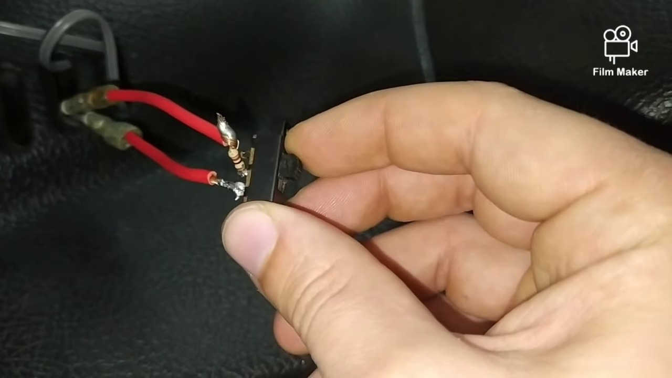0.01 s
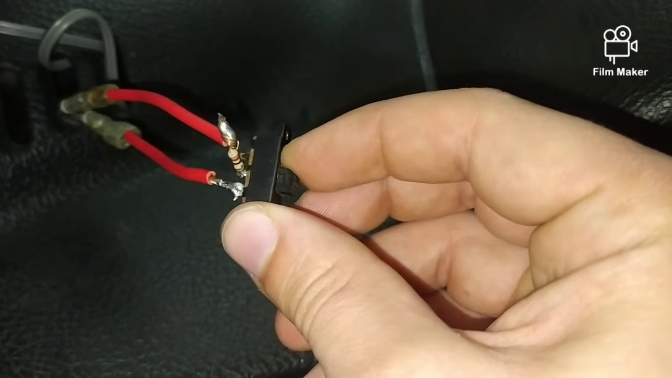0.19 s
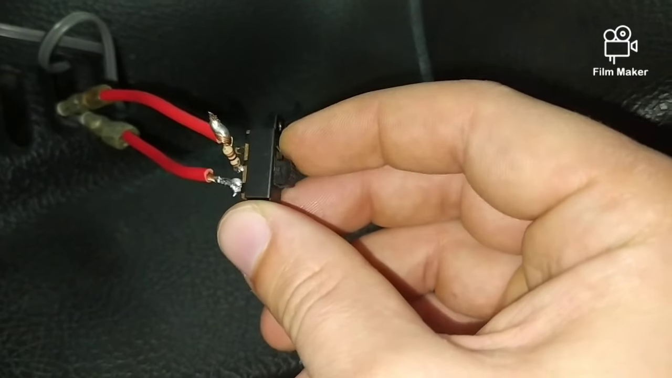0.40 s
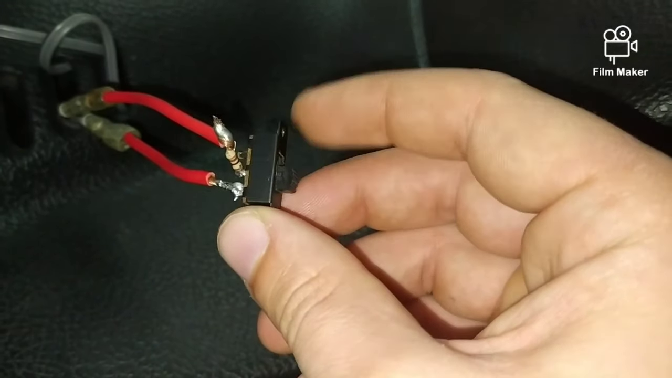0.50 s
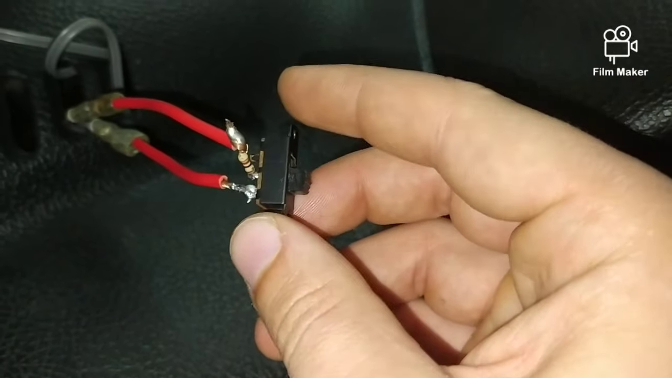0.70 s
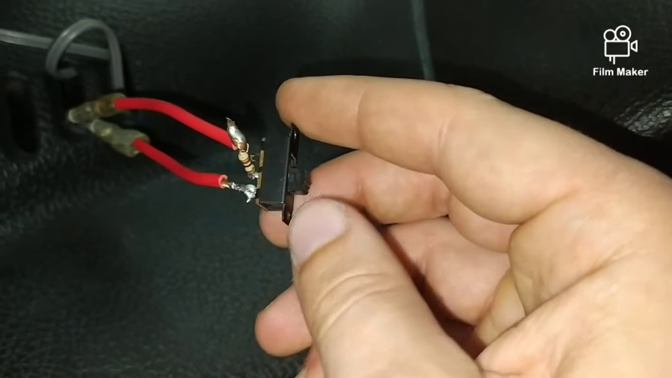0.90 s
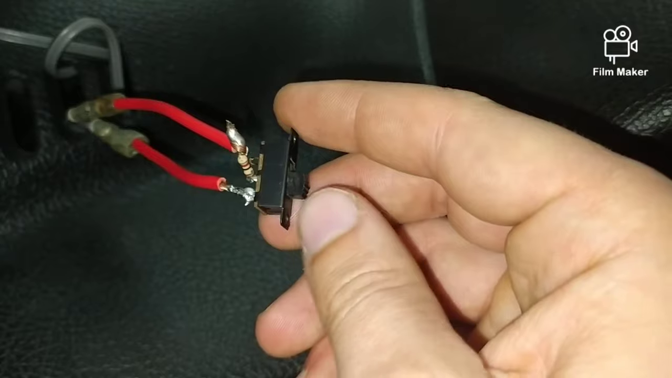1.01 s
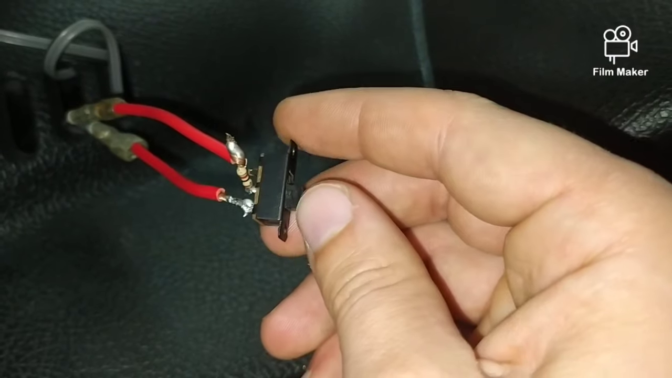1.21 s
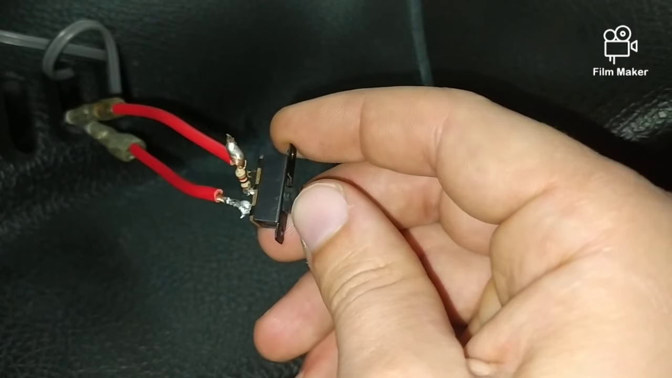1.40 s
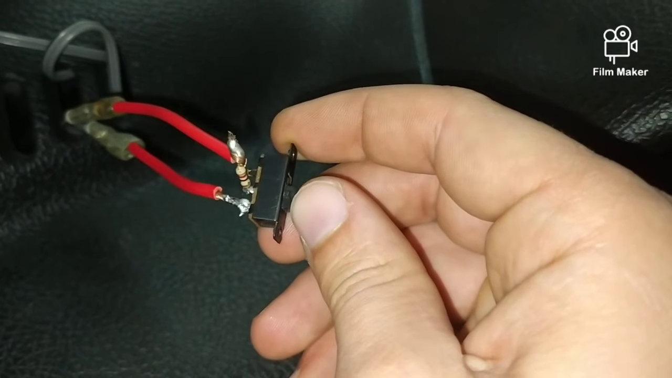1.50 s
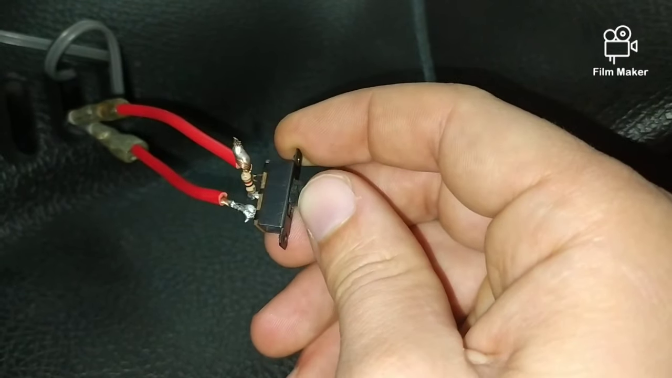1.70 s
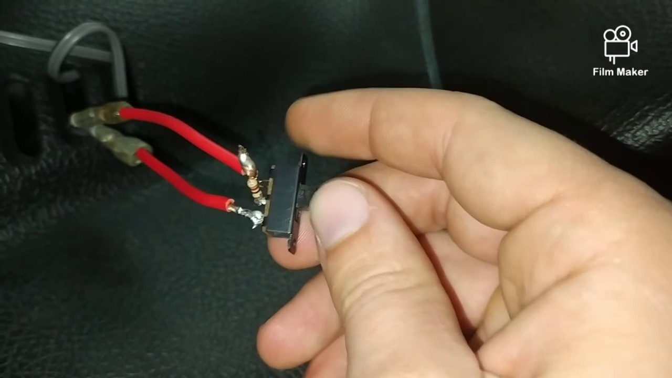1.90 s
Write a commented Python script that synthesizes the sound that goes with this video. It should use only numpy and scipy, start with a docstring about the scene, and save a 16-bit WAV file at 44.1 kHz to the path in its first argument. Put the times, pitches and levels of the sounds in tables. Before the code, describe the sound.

A small hand-held slide switch clicks sharply at 0.2 s: a tiny tick, a bright metallic snap with brief springy ring, then a soft low knock. Faint finger rubs and taps follow over quiet car-cabin rumble, drone and thin hiss, with a barely audible high trill pulsing twice a second. From 1.5 s a thumb drags with a low groan; at 1.7 s the slider snaps back, crisp and short, and the grip shifts. Close microphone, short cabin reflections.

```python
"""Inside a quiet car, a microphone close to a small slide switch hears low rumble, drone and thin hiss throughout.
A fingertip touches the housing; the slider ticks off its detent and snaps home at 0.2 s, then a soft low knock.
Its metal frame and spring ring, its plastic knocks and the cabin reflects it, as echoes of shaped noise.
Fingers rub and tap (noise bursts) while a faint high trill (narrow-band noise) swells about twice a second.
From 1.5 s the thumb drags in random slips with a low groan; at 1.7 s the slider snaps back, and the grip shifts."""
import sys
import numpy as np
from scipy import signal
from scipy.fft import rfft, irfft
from scipy.io import wavfile
from scipy.ndimage import uniform_filter1d

SR = 44100
rng = np.random.default_rng(int(sys.argv[2]) if len(sys.argv) > 2 else 0)


def inscribe(sig):
    """Save sig as 16-bit PCM at rate SR to the path in sys.argv[1].

    A 1-D sig is mono; a 2-D sig holds one channel per row.
    Samples are clipped to [-1, 1] before scaling.
    """
    pcm = np.round(np.clip(np.atleast_2d(sig).T, -1, 1) * 32767)
    wavfile.write(sys.argv[1], SR, pcm.astype(np.int16))


N = 88200  # two seconds

# Rub, touch and trill levels set loudness directly; mode, colour, knock and clack levels are relative.
# Blows of the slider: [t/s, level/dB, end stop 0 or 1, contact time constant/ms,
# left minus right/dB, right later by/ms, knock level/dB, clack level/dB]
BLOWS = [(0.2052, -27.5, 0, 1.8, -2.5, 0.1, -15.5, -15), (0.208, -2.5, 0, 1.4, -1.5, 0.3, -5.5, 1.5),
         (0.2175, -17.5, 0, 2.6, -4.5, 0.059, 11.5, 8), (1.6935, -33.5, 1, 0.8, 18, 0.0, -10, -12.5),
         (1.6958, -6.5, 1, 0.36, -6.5, -0.25, -11, 1.5)]
# Resonances of the metal frame and slider: [f/Hz, nominal width/Hz, level at stop 0/dB, level at stop 1/dB]
FRAME_MODES = [(4585, 400, -19, -31), (5950, 520, -11.5, -14.5), (7000, 700, -25.5, -12),
               (7530, 400, -5.5, -7.5), (8560, 150, -1, -10.5), (8900, 400, -1, 2), (9150, 400, -12, -15),
               (9560, 1200, -9.5, 1), (9800, 400, -4, -5), (10900, 600, -16, -12.5),
               (12270, 1100, -12.5, -41), (14040, 800, -12, -15), (15124, 650, -20, -30.5)]
# Close modes of the contact spring, which ring on: [f/Hz, t60/s, level at stop 0/dB, level at stop 1/dB]
SPRING_MODES = [(8360, .05, -9.5, -6.5), (8300, 0.03, -10.5, -16.5), (8453, .055, 0.5, -19.5),
                (8880, .05, -2.5, -16), (9120, .05, -0.5, -7), (9020, 0.069, -1.5, -8),
                (8400, 0.066, -12.5, 5.5), (9360, 0.038, -8.5, -13), (8900, 0.063, -12, -5),
                (10560, .045, -4, -16)]
# Low modes of the hand-held housing, the knock: [f/Hz, t60/s, level/dB]
HOUSING_MODES = [(315, 0.029, -4.5), (375, 0.037, 10), (588.6, .045, -15.5), (780, .04, -11)]
# Modes of the plastic slider, the clack: [f/Hz, t60/s, level/dB]
SLIDER_MODES = [(1070, .015, -5.5), (1280, 0.0053, -1.5), (2023, .02, -1.5), (2350, .02, -4.5),
                (2650, 0.0052, -4.5), (3010, .015, -10.5)]
# Resonances of the thumb's rub before the return stroke: [f/Hz, t60/s, level/dB]
DRAG_MODES = [(208, 0.039, -1.5), (226, 0.051, -3.5), (294, 0.037, -5), (347, 0.0445, -10.5),
              (465, 0.094, -2.5), (519, 0.099, -12), (712.5, 0.11, -4)]
# Fingers sliding on the housing: [t/s, attack/s, hold/s, release time constant/s, level/dB]
RUBS = [(0.336, 0.028, 0.045, 0.13, -63), (1.301, 0.039, .04, 0.11, -73),
        (1.664, 0.023, 0.032, 0.025, -65.5), (1.742, 0.052, 0.03, 0.11, -65.5),
        (1.964, 0.012, 0.011, 0.034, -71)]
# Spectrum of the sliding skin: [f/Hz, level/dB]
RUB_COLOUR = [(150, 3.5), (400, 5), (900, 1.5), (1400, 3), (2200, 7), (3100, -12.5), (5000, -9.5),
              (9000, -6.5), (12000, -27), (16000, -27)]
# Soft fingertip touches: [t/s, level/dB]
TOUCHES = [(0.078, -71.5), (0.97, -70), (1.231, -75.5), (1.394, -69), (1.477, -76.5), (1.938, -69)]
# Spectrum of a touch: [f/Hz, level/dB]
TOUCH_COLOUR = [(100, -12), (350, 2.5), (850, 9.5), (1500, -5.5), (2500, 1.5), (5000, -40), (16000, -20)]
# Swells of the faint high trill: [t/s, length/s, level/dB]
TRILLS = [(0.193, 0.33, -76.5), (0.695, 0.32, -82.5), (1.2, 0.3, -79), (1.689, 0.222, -77.5)]
# Spectrum of the cabin background: [f/Hz, level per Hz/dB]
AIR_COLOUR = [(20, 0.5), (33, -9.5), (60, -12), (113, -20), (160, -19.5), (204, -14.5), (262, -20.5),
              (460, -23), (600, -28), (1060, -32), (2200, -32.5), (3700, -38), (7000, -39.5),
              (10200, -33.5), (11500, -43.5), (16000, -52)]

CLICK_DB, SPRING_DB, KNOCK_DB, CLACK_DB = 4.5, -6.5, -21.5, -23.5
FRAME_LOW_HZ = 4400  # the small frame radiates little below this
PANEL_DAMP_HZ = 12000  # upholstery dulls the near reflections
TAIL_HZ, TAIL_WIDTH_HZ = 8740, 2800  # the band that lingers longest
DRAG_S, DRAG_LENGTH_S, DRAG_DB = 1.545, 0.11, -60  # length is attack and hold together
DRAG_ATTACK_S, DRAG_RELEASE_S = 0.0095, 0.14
SLIPS_PER_S, SLIP_SOFT_HZ = 900, 750  # skin softens each slip
GROAN_HZ, GROAN_DB, GROAN_WAVER = 318, -61.5, 0.012  # waver is a fraction of the pitch
RUB_PAN_DB, RUB_ROUGH_DB = -8, -0.5  # left minus right; spread of the random roughness
TRILL_HZ, TRILL_WIDTH_HZ, TRILL_FADE_S = 4513, 90, 0.079
TRILL_REST_DB = -87.5  # it never quite stops
AIR_DB, AIR_PAN_DB, AIR_SIDE, AIR_WAVER_DB = -65, -1, 0.9, 0.1
DRONE_HZ, DRONE_WIDTH_HZ, DRONE_DB = 197.6, 14, -83.5
TOP_HZ = 15800  # upper limit of the sound


def switch():
    """Each brief, rough contact snaps the frame, rings the spring and knocks the plastic; the cabin reflects them."""
    t = clock()
    hz, width, *stop_levels = np.array(FRAME_MODES, float).T
    frames = [resonator(hz, width, db) for db in stop_levels]
    springs = [ring([(f, t60, dbs[stop]) for f, t60, *dbs in SPRING_MODES], np.sin) for stop in range(2)]
    housing = ring(HOUSING_MODES, np.cos)
    slider = ring(SLIDER_MODES, np.cos)
    high_pass = signal.butter(4, FRAME_LOW_HZ, "high", fs=SR, output="sos")
    bright, dull = np.zeros((2, N)), np.zeros((2, N))
    for start, db, stop, contact_ms, pan_db, lag_ms, knock_db, clack_db in BLOWS:
        contact = even(np.exp(-(t * 1000 / contact_ms) ** 2))

        def struck(body):
            """The body's ring, set off by this contact."""
            return energy(convolve(contact, body))

        stop = int(stop > 0.5)
        metal = undb(CLICK_DB) * struck(frames[stop])
        metal += undb(SPRING_DB) * signal.sosfilt(high_pass, struck(springs[stop]))
        clack = undb(CLACK_DB + clack_db) * struck(slider)
        left, right = undb(db) * pan(pan_db) * (metal + clack)
        bright += np.array([delay(left, start), delay(right, start + lag_ms / 1000)])
        # the low knock reaches both channels alike
        dull += undb(db + KNOCK_DB + knock_db) * delay(struck(housing)[0], start)
    return bright + dull + cabin(bright, dull)


def cabin(bright, dull):
    """Near panels and a long coloured tail answer the click; a short, narrower boom answers the knock."""
    panels = reflections(db=-6, rise_s=0.0016, t60=0.041)
    panels = signal.lfilter(*signal.butter(1, PANEL_DAMP_HZ, fs=SR), panels)
    lingering = signal.iirpeak(TAIL_HZ, TAIL_HZ / TAIL_WIDTH_HZ, fs=SR)
    tail = reflections(db=-24.5, rise_s=0.01, t60=0.5)  # level ahead of the two filter passes
    for _ in range(2):
        tail = signal.lfilter(*lingering, tail)
    boom = reflections(db=0.93, rise_s=0.005, t60=0.037)
    boom = (boom + boom.mean(axis=0)) / 2  # narrows the stereo image
    return convolve(bright, panels + tail) + convolve(dull, boom)


def drag():
    """Irregular slips under the thumb ring a few low resonances, while a low groan swells and fades among them."""
    slips = rng.standard_normal(N) * (rng.random(N) < SLIPS_PER_S / SR)
    slips = signal.sosfilt(signal.butter(3, SLIP_SOFT_HZ, fs=SR, output="sos"), slips)
    rub = convolve(slips, ring(DRAG_MODES, np.cos))
    rub = unit(rub + convolve(rub, reflections(db=-2, rise_s=0.0026, t60=0.027)))
    pressure = swell(DRAG_S, DRAG_ATTACK_S, DRAG_LENGTH_S - DRAG_ATTACK_S, DRAG_RELEASE_S)
    pitch = GROAN_HZ * (1 + GROAN_WAVER * walk(40))
    groan = unit(np.sin(2 * np.pi * np.cumsum(pitch) / SR))
    groan_swell = swell(start=1.59, attack=0.056, hold=0.041, release=0.045)
    return undb(DRAG_DB) * rub * pressure + undb(GROAN_DB) * groan * groan_swell


def fingers():
    """Skin slides over the housing as rough noise and taps it lightly as the grip changes."""
    rubbing = sum(undb(db) * swell(start, attack, hold, release) for start, attack, hold, release, db in RUBS)
    touching = sum(undb(db) * swell(start, 0.0011, 0.009, 0.0047) for start, db in TOUCHES)
    roughness = undb(RUB_ROUGH_DB * walk(160))
    slides = rubbing * roughness * noise(RUB_COLOUR)
    taps = touching * noise(TOUCH_COLOUR)
    return pan(RUB_PAN_DB) * (slides + taps)


def trill():
    """A narrow high band of noise swells and sinks about twice a second."""
    t = clock()
    band = unit(narrow_band(rng.standard_normal((2, N)), TRILL_HZ, TRILL_WIDTH_HZ))
    swells = 0
    for start, length, db in TRILLS:
        edge_distance = np.minimum(t - start, start + length - t)
        swells = swells + undb(db) * np.clip(edge_distance / TRILL_FADE_S, 0, 1)
    return band * np.hypot(swells, undb(TRILL_REST_DB))


def background():
    """Low rumble and thin hiss of the quiet cabin as coloured noise, with a faint narrow-band drone."""
    drone = unit(narrow_band(rng.standard_normal(N), DRONE_HZ, DRONE_WIDTH_HZ))
    level = undb(AIR_DB + AIR_WAVER_DB * walk(11))
    air = level * pan(AIR_PAN_DB) * noise(AIR_COLOUR, side=AIR_SIDE)
    return air + undb(DRONE_DB) * drone


def resonator(hz, width, db):
    """Minimum-phase response of broad, overlapping resonances that fall away steeply below FRAME_LOW_HZ."""
    f = np.maximum(bins(), 1)
    detuning = (f - hz[:, None]) / (0.75 * width[:, None])
    power = np.sum(undb(db)[:, None] ** 2 / (1 + detuning ** 2) ** 1.7, axis=0)
    power = power / (1 + (FRAME_LOW_HZ / f) ** 8) + 1e-7
    # folding the cepstrum puts the energy as early as this spectrum allows
    cepstrum = irfft(np.log(power) / 2, N)
    cepstrum[1:N // 2] *= 2
    cepstrum[N // 2 + 1:] = 0
    return energy(irfft(np.exp(rfft(cepstrum)), N))


def ring(modes, wave):
    """Sum of decaying (f, t60, level) modes; the level sets each mode's energy."""
    t = clock()
    total = 0
    for hz, t60, db in modes:
        total = total + undb(db) * energy(wave(2 * np.pi * hz * t) * undb(-60 * t / t60))
    return total


def reflections(db, rise_s, t60):
    """Dense stereo echoes that build up and die away."""
    t = clock()
    return undb(db) * even((1 - np.exp(-t / rise_s)) * np.exp(-np.log(1000) * t / t60), count=1)


def even(env, count=4):
    """Random stereo burst under an envelope, with all frequencies about equally strong."""
    burst = rng.standard_normal((2, N)) * env
    limit = 2 * energy(env)
    for _ in range(count):
        spectrum = rfft(burst)
        flat = irfft(spectrum / (abs(spectrum) + 1e-12), N)
        burst = np.clip(flat, -limit, limit)
    return energy(burst)


def noise(colour, side=1.0):
    """Stereo noise with a spectrum of (f, level) points; side sets the width."""
    hz, db = np.array(colour).T
    gain = undb(np.interp(np.log(np.maximum(bins(), 1)), np.log(hz), db))
    middle, sides = irfft(rfft(rng.standard_normal((2, N))) * gain, N)
    return unit(np.array([middle + side * sides, middle - side * sides]))


def narrow_band(x, hz, half_width_hz):
    """Keep a narrow band; the amplitude halves at half_width_hz from its centre."""
    return irfft(rfft(x) / (1 + ((bins() - hz) / half_width_hz) ** 2), N)


def swell(start, attack, hold, release):
    """Straight attack, hold, exponential release."""
    t = clock() - start
    return np.clip(t / attack, 0, 1) * np.exp(-np.maximum(t - attack - hold, 0) / release)


def walk(rate):
    """Smoothed random steps, rate per second, with rms 1."""
    k = max(int(SR / rate), 1)
    steps = np.repeat(rng.standard_normal(N // k + 1), k)
    return unit(uniform_filter1d(steps, k)[:N])


def delay(x, s):
    """Shift later by s seconds."""
    k = int(np.clip(round(s * SR), 0, N - 1))
    return np.concatenate([np.zeros(k), x[:N - k]])


def convolve(a, b):
    """Let response b answer signal a, channel by channel."""
    return signal.fftconvolve(np.atleast_2d(a), np.atleast_2d(b), axes=-1)[:, :N]


def pan(db):
    """Left and right gains that differ by db."""
    return undb(np.array([[db], [-db]]) / 2)


def unit(x):
    """Scale to rms 1."""
    return x / np.sqrt(np.mean(x ** 2))


def energy(x):
    """Scale each channel to energy 1."""
    return x / np.sqrt(np.sum(x ** 2, axis=-1, keepdims=True))


def undb(db):
    """Amplitude of a level in dB."""
    return 10 ** (np.asarray(db) / 20)


def clock():
    """Time in s of every sample."""
    return np.arange(N) / SR


def bins():
    """Frequency in Hz of every spectrum bin."""
    return np.arange(N // 2 + 1) * SR / N


def scene():
    """The switch and the hand, close to the microphone, over the trill and the cabin."""
    return switch() + drag() + fingers() + trill() + background()


def record(dry):
    """Keep the sound below TOP_HZ with a steep low-pass."""
    return signal.sosfilt(signal.ellip(8, 0.2, 70, TOP_HZ, fs=SR, output="sos"), dry)


dry = scene()
out = record(dry)
inscribe(out)
```